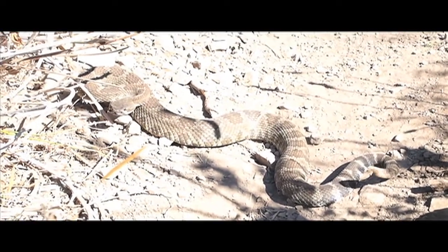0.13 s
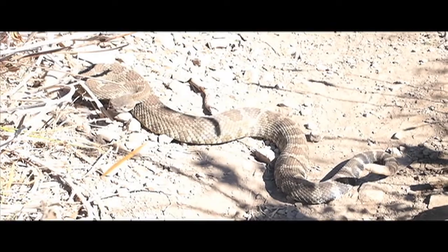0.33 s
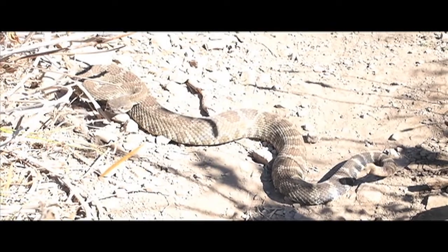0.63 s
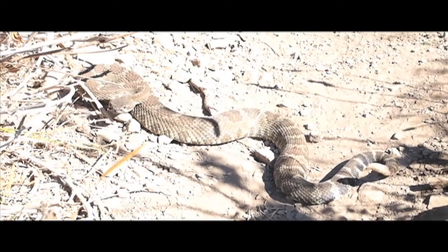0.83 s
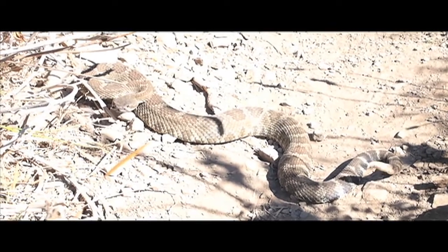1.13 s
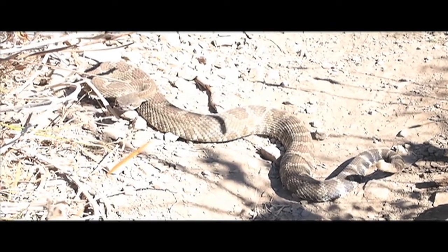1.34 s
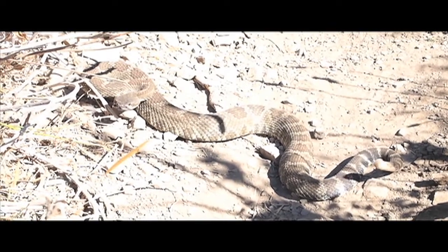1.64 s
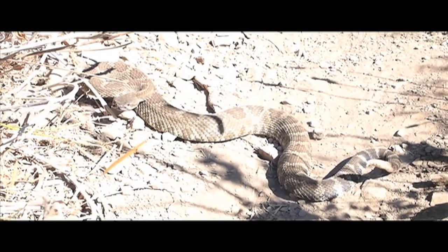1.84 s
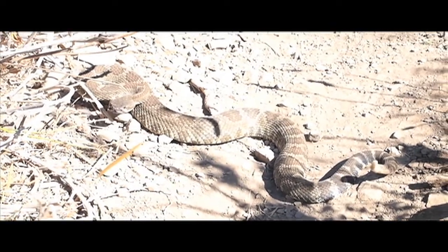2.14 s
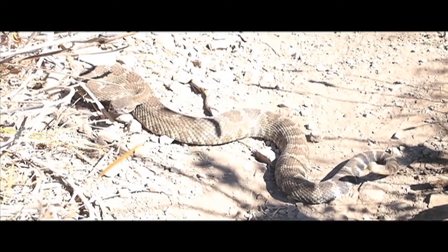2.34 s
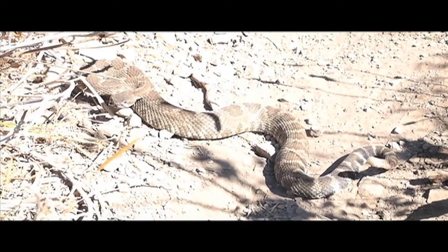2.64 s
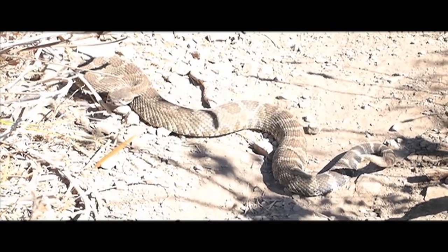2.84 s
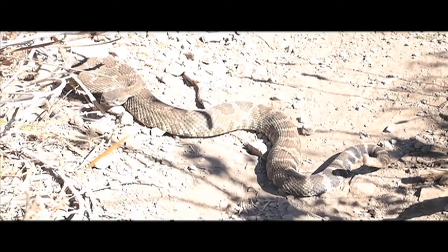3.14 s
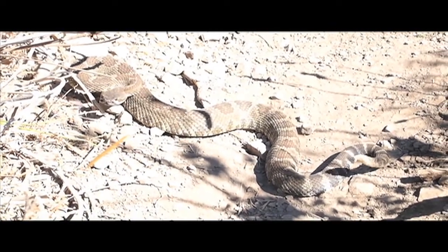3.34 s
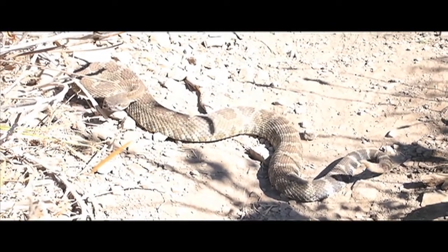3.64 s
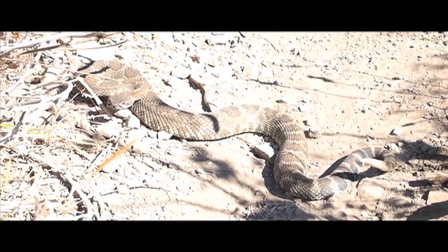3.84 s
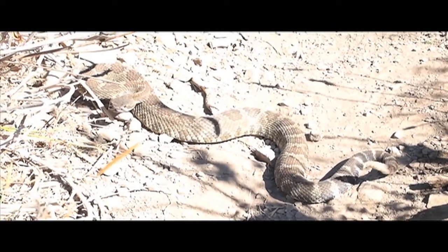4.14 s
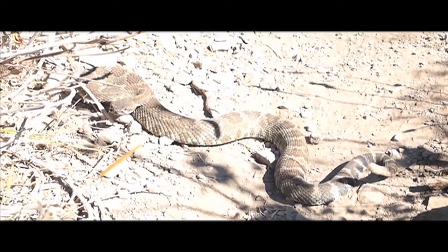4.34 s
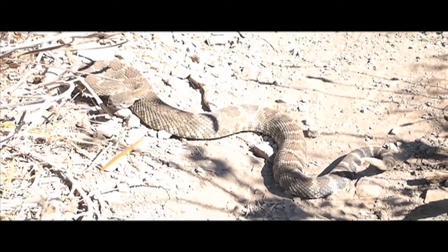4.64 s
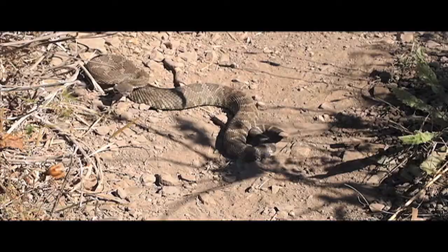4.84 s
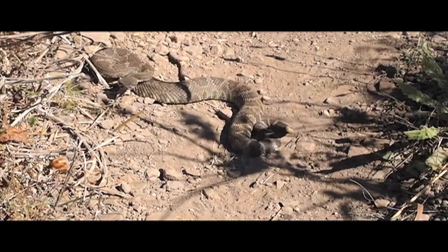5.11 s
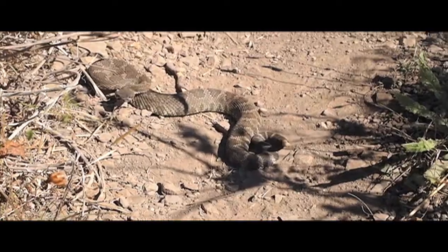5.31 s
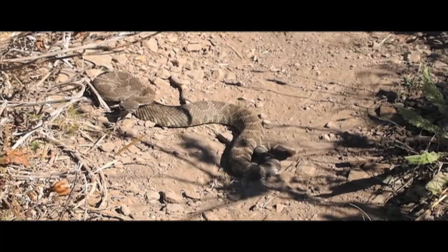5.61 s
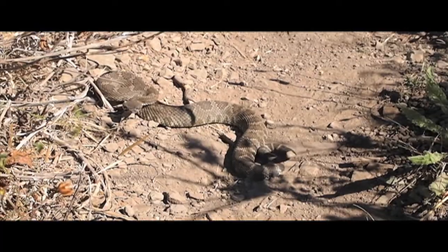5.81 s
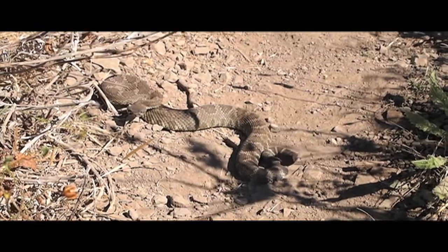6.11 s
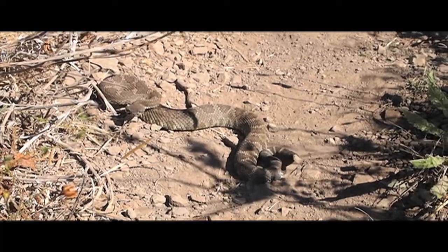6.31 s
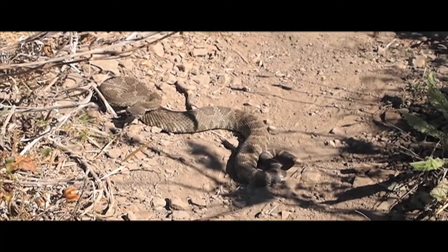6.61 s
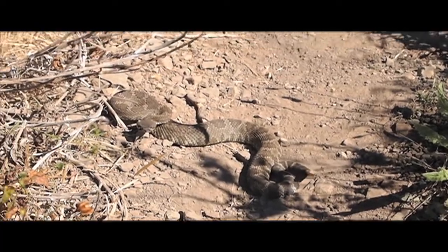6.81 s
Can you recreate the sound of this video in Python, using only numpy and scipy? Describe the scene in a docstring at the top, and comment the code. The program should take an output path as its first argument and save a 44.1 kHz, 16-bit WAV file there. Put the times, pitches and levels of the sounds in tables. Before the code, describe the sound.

A rattlesnake shakes its tail close by in a dry, high buzz, breaks into a few short flicks, then buzzes again.

```python
"""Dry ground in the open, a rattlesnake close to the camera microphone. Its loose horny tail segments
collide at every turn of the tail and ring their hollows. The buzz throbs, with a hard clack now and
then, breaks into six short flicks, then starts again faster. Behind it lie faint open air, three soft
rustles and a low rumble that comes in late."""
import sys
import numpy as np
from scipy import signal
from scipy.fft import rfft, irfft, next_fast_len
from scipy.io import wavfile

SR = 44100
rng = np.random.default_rng(int(sys.argv[2]) if len(sys.argv) > 2 else 0)


def digitize_waveform(pressure):
    """Quantize a signal to 16-bit integers and store it at the path in sys.argv[1].

    Rows of a 2-D input are taken as channels; values are limited to [-1, 1].
    """
    field = np.atleast_2d(pressure).T
    bounded = np.clip(field, -1, 1)
    quanta = np.round(bounded * 32767).astype(np.int16)
    wavfile.write(sys.argv[1], SR, quanta)


N = 306936

# how hard the tail is shaken: time_s, level_db
TAIL_EFFORT = [(0, -20), (.18, -17.5), (.33, -19), (.6, -18), (1, -18), (1.4, -19), (2.1, -19),
               (2.42, -21.5), (2.6, -19), (3.06, -19), (3.16, -19), (3.33, -20.5), (3.7, -18),
               (4.75, -18.5), (5.1, -20), (5.38, -20), (6.4, -18), (6.96, -18.5)]
# turns of the tail, two for each full shake: time_s, turns_per_s
TAIL_SPEED = [(0, 104), (.35, 90.3), (1.3, 87), (2.5, 85.3), (3, 88), (4.3, 90), (4.45, 95), (5.4, 86),
              (6.3, 88), (6.55, 104), (6.96, 108)]
# the tail sways and the buzz throbs: first_swell_s, last_swell_s, rate_hz, depth_db (before throb_scale)
TAIL_SWAYS = [(0.278, .87, 13.6, 0.6), (.985, 1.27, 10.5, 0.7), (1.42, 1.705, 14.1, 1.1),
              (1.814, 2.05, 12.4, 1.8), (2.125, 2.522, 10.3, 2.5), (2.604, 2.92, 13.4, 1.2),
              (3.181, 3.378, 9.63, 3.5), (3.465, 3.988, 12.4, 1), (6.43, 6.93, 10.2, 0.5)]
# the tail slackens for a moment: centre_s, change_db
TAIL_LULLS = [(.68, -1.5), (2.465, -3), (3.06, -4), (3.345, -2), (3.96, -2.5), (5.04, -2.5)]
# ring of the hollow segments, before and after the buzz changes colour: frequency_hz, gain_db
SHELL_EARLY = [(900, -54.5), (2050, -36), (2350, -26), (3800, -23.5), (4300, -17), (5050, -8.5),
               (5530, 0.0), (6150, -10), (7200, -20.5), (8700, -22), (10500, -27.0), (12000, -27),
               (13300, -28), (14700, -29)]
SHELL_LATE = [(900, -42.5), (2050, -35.5), (2700, -19), (3400, -20.5), (3950, -17), (4800, -13.5),
              (5570, 1.5), (6100, -9.5), (6500, -11.5), (7500, -21), (9500, -25.5), (11200, -24),
              (12400, -31.2), (15000, -27)]
# wash of the open air: time_s, level_db
AIR_LEVEL = [(0, -50), (4.7, -49), (5.4, -45.5), (5.8, -48), (6.96, -48.5)]
# colour of that wash: frequency_hz, gain_db
AIR_SPECTRUM = [(20, -24), (40, -6.5), (75, -2.5), (110, 0.5), (170, -3.5), (300, -4), (600, -9),
                (1200, -13.5), (2000, -15.5), (5000, -23.5), (15000, -25.5)]
# hard knocks of the segments within the buzz: time_s, strength_db
SEGMENT_CLACKS = [(.543, -7), (1.558, -7), (2.314, -5), (2.424, -7), (2.469, -11), (2.695, -7), (2.721, -8),
                  (3.866, -8), (5.064, -7)]
# soft rustles: centre_s, level_db, half_width_s
RUSTLE_SWELLS = [(.85, -54.5, .15), (4.795, -46.5, 0.075), (6.71, -52, .037)]
# colour of the rustles: frequency_hz, gain_db
RUSTLE_SPECTRUM = [(200, -30), (500, -2), (850, -6), (1200, 2.5), (1600, -3), (3000, -21)]
# colour of the low rumble: frequency_hz, gain_db
RUMBLE_SPECTRUM = [(20, -6), (45, -5), (75, -3), (125, 2.5), (200, -6), (400, -24.5)]
# single flicks of the tail: full_strength_s, rise_s, hold_s, level_db, rebound_below_db
TAIL_FLICKS = [(5.462, 0.035, .03, -18, 11), (5.597, 0.029, 0.029, -18.5, 12), (5.761, 0.016, .04, -19, 14),
               (5.953, 0.027, .025, -17.5, 12), (6.106, 0.015, 0.042, -18, 18),
               (6.25, 0.03, 0.024, -18, 17)]

RING_HZ = 5615  # the air inside the segments
COLOUR_CHANGE_S, COLOUR_FADE_S = 4.86, 0.018
STOP_S, WIND_DOWN_DB_PER_S = 5.375, 159
RESTART_S, WIND_UP_DB_PER_S = 6.368, 1000


def amp(db):
    """Decibels to gain."""
    return 10 ** (np.asarray(db) / 20)


def unit(x):
    """Scale to rms 1."""
    return x / np.sqrt(np.mean(x ** 2) + 1e-20)


def clock():
    """Time of each sample in seconds."""
    return np.arange(N) / SR


def curve(rows):
    """Rows of time_s, value joined by straight lines."""
    return np.interp(clock(), *np.transpose(rows))


def bumps(rows):
    """Sum of bell-shaped humps from rows of centre_s, height, half_width_s."""
    out, t = np.zeros(N), clock()
    for centre, height, half in rows:
        near = slice(*np.searchsorted(t, [centre - np.pi * half, centre + np.pi * half]))
        out[near] += height * np.exp(-((t[near] - centre) / half) ** 2)
    return out


def coloured(x, spectrum):
    """Causal filter that follows rows of frequency_hz, gain_db."""
    size = next_fast_len(N + SR // 2) // 2 * 2
    hz, db = np.transpose(spectrum)
    gain_db = np.interp(np.log(np.fft.rfftfreq(size, 1 / SR) + 1), np.log(hz), db)
    cepstrum = irfft(np.log(amp(gain_db) + 1e-6), size)
    cepstrum[1:size // 2] *= 2  # minimum phase: the ringing follows the hit
    cepstrum[size // 2 + 1:] = 0
    return irfft(rfft(x, size) * np.exp(rfft(cepstrum)), size)[:N]


def levelled(x, span_s):
    """Hold the rms near 1 over span_s, leaving the faster grain."""
    window = np.hanning(int(span_s * SR))
    power = signal.fftconvolve(x ** 2, window / window.sum(), "same")
    return x / np.sqrt(np.abs(power) + 1e-12)


def clicks(times, sizes):
    """Impulses at the given times."""
    index = np.clip(np.round(times * SR), 0, N).astype(int)
    return np.bincount(index.ravel(), sizes.ravel(), N + 1)[:N]


def collisions(turns, lag_s, jitter_s, limp_db, stroke_db, scatter_db, count):
    """At each turn the segments strike one after another; one side of the shake hits harder."""
    per_turn, per_hit = (len(turns), 1), (len(turns), count)
    starts = turns[:, None] + jitter_s * rng.standard_normal(per_turn)
    times = starts + lag_s * rng.gamma(2, 1 / 2, per_hit)
    side = (-1) ** np.arange(len(turns))[:, None]
    turn_db = limp_db * side + stroke_db * rng.standard_normal(per_turn)
    hit_db = turn_db + scatter_db * rng.uniform(-1, 1, per_hit)
    polarity = np.sign(rng.standard_normal(per_hit))
    return unit(clicks(times, amp(hit_db) * polarity))


def scrape(contact, decay_s):
    """The faces slide for an instant after each contact."""
    sliding = signal.lfilter([1], [1, -np.exp(-1 / (decay_s * SR))], contact ** 2)
    return unit(np.sqrt(sliding) * rng.standard_normal(N))


def rubbing(contact, above_hz, hiss_share):
    """In the high treble the contacts blur into a steadier rubbing hiss."""
    blurred = np.sqrt(1 - hiss_share) * contact + np.sqrt(hiss_share) * rng.standard_normal(N)
    highpass = signal.butter(4, above_hz, "high", fs=SR)
    return contact + signal.filtfilt(*highpass, blurred - contact)


def cavity(x, width_hz):
    """The air inside the segments rings in one band."""
    return signal.lfilter(*signal.iirpeak(RING_HZ, RING_HZ / width_hz, SR), x)


def shaking(throb_scale):
    """Strength of the tail's motion: throbbing effort with lulls, and a pause filled with flicks."""
    t = clock()
    pause_db = np.minimum(WIND_DOWN_DB_PER_S * (t - STOP_S), WIND_UP_DB_PER_S * (RESTART_S - t))
    lull_db = bumps([(centre, db, 0.021) for centre, db in TAIL_LULLS])
    steady = amp(curve(TAIL_EFFORT) + throb_scale * throbbing() + lull_db - np.maximum(pause_db, 0))
    return np.sqrt(steady ** 2 + flicks())


def rattle():
    """Close to the microphone, hard strikes, loose bounces and a dry scrape ring the hollow segments."""
    turn_count = np.cumsum(curve(TAIL_SPEED)) / SR
    turns = np.interp(np.arange(int(turn_count[-1]) + 1), turn_count, clock())
    strikes = collisions(turns, lag_s=.0014, jitter_s=.0009, limp_db=.5, stroke_db=.8,
                         scatter_db=3, count=4)
    bounces = collisions(turns, lag_s=.009, jitter_s=.001, limp_db=.1, stroke_db=.06,
                         scatter_db=3, count=6)
    contact = unit(strikes + amp(2.5) * bounces)
    scrapes = amp(2.5) * scrape(contact, decay_s=.0014) + amp(-4) * scrape(contact, decay_s=.026)
    contact = rubbing(unit(contact + scrapes), above_hz=5900, hiss_share=.2)
    # the buzz changes colour abruptly
    late_share = np.clip((clock() - COLOUR_CHANGE_S) / COLOUR_FADE_S, 0, 1)
    early = unit(coloured(contact, SHELL_EARLY))
    late = unit(coloured(contact, SHELL_LATE))
    buzz = levelled((1 - late_share) * early + late_share * late, span_s=.038)
    # a few square hits in each turn leave longer beads of ringing
    hits = collisions(turns, lag_s=.0043, jitter_s=.002, limp_db=1.1, stroke_db=1, scatter_db=4, count=2)
    beads = levelled(cavity(cavity(hits, width_hz=190), width_hz=960), span_s=.074)
    ring = cavity(buzz, width_hz=280)
    resonance = amp(-3.5) * ring + amp(-6) * beads
    hiss = buzz - ring
    return shaking(throb_scale=1.55) * resonance + shaking(throb_scale=.8) * hiss


def noise(spectrum):
    """Coloured noise at rms 1."""
    return unit(coloured(rng.standard_normal(N), spectrum))


def open_air():
    """A faint, low wash of open air behind the snake."""
    return amp(curve(AIR_LEVEL)) * noise(AIR_SPECTRUM)


def throbbing():
    """The swaying tail swings the level; each spell fades in and out over one sway."""
    t, swing_db = clock(), np.zeros(N)
    for first, last, rate_hz, depth_db in TAIL_SWAYS:
        fade = np.clip(1 + rate_hz * np.minimum(t - first, last - t), 0, 1)
        swing_db += depth_db * fade * np.cos(2 * np.pi * rate_hz * (t - first))
    return swing_db


def clacks():
    """Now and then the segments hit together and the cavity rings on."""
    times, db = np.transpose(SEGMENT_CLACKS)
    knocks = coloured(clicks(times, amp(db)), SHELL_EARLY)
    ringing = knocks + amp(15) * cavity(knocks, width_hz=420)
    return amp(db.max()) * ringing / np.abs(ringing).max()


def rustles():
    """Soft midrange rustles swell and fade in the background."""
    swells = bumps([(centre, amp(db), half) for centre, db, half in RUSTLE_SWELLS])
    return swells * noise(RUSTLE_SPECTRUM)


def rumble(start_s=4.8, rise_s=.12, level_db=-50, ebb_db_per_s=3):
    """A low rumble rises and slowly ebbs."""
    age = np.maximum(clock() - start_s, 0)
    surge = np.minimum(age / rise_s, 1) * amp(level_db - ebb_db_per_s * age)
    return surge * noise(RUMBLE_SPECTRUM)


def flicks(fall_db_per_s=1100, rebound_s=.04, rebound_half_s=.01, settle_db=-21, settle_db_per_s=234):
    """Power of the flicks: each rises, holds and falls; the rattle swings back once and settles."""
    t, power = clock(), np.zeros(N)
    for full, rise, hold, db, rebound_below_db in TAIL_FLICKS:
        end = full + hold
        growing = np.clip(1 + (t - full) / rise, 0, 1) ** 2
        after = np.maximum(t - end, 0)
        dying = amp(-fall_db_per_s * after) ** 2 + amp(settle_db - settle_db_per_s * after) ** 2
        power += (amp(db) * growing) ** 2 * dying
        power += bumps([(end + rebound_s, amp(db - rebound_below_db) ** 2, rebound_half_s)])
    return power


def scene():
    """The snake up close and the open air behind it, in mono."""
    snake = rattle() + clacks()
    background = open_air() + rumble() + rustles()
    return (snake + background)[None]


def record(dry):
    """The camera has a narrow notch in its treble and keeps nothing above its band limit."""
    notch_hz, notch_half_hz, top_hz = 7870, 100, 15790
    size = next_fast_len(N + SR // 2)
    hz = np.fft.rfftfreq(size, 1 / SR)
    notch = 1 - .95 * np.exp(-((hz - notch_hz) / notch_half_hz) ** 2)
    return irfft(rfft(dry, size) * notch * (hz < top_hz), size)[..., :N]


dry = scene()
out = record(dry)
digitize_waveform(out)
```